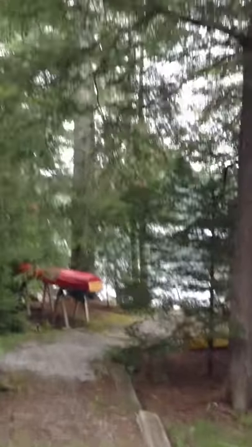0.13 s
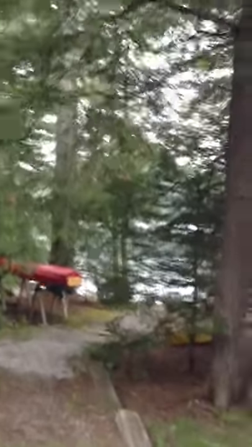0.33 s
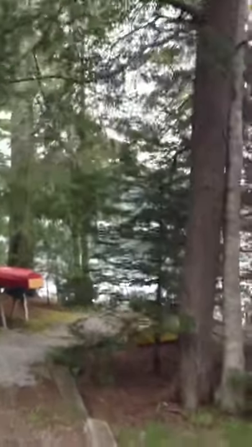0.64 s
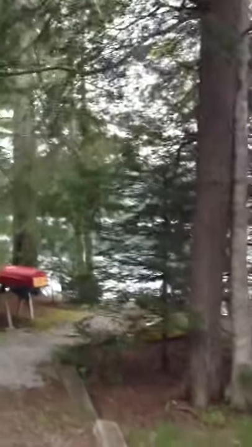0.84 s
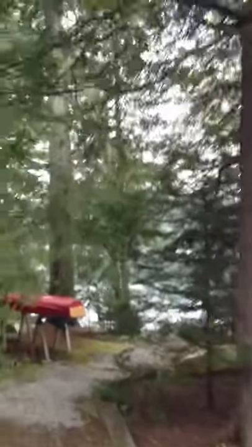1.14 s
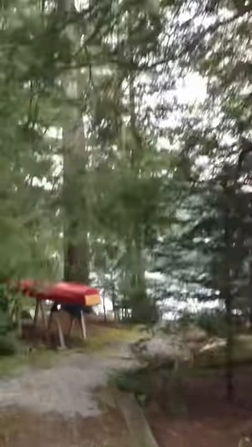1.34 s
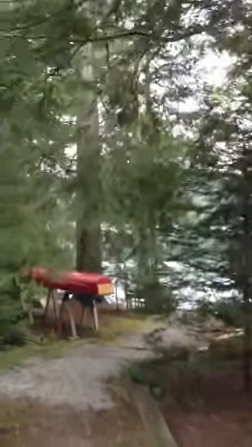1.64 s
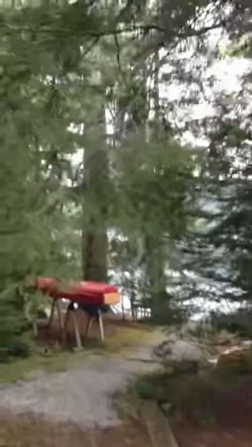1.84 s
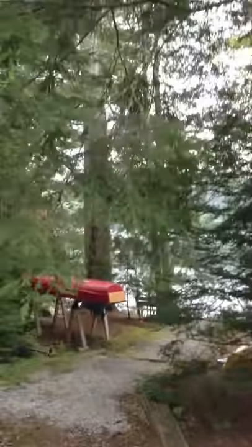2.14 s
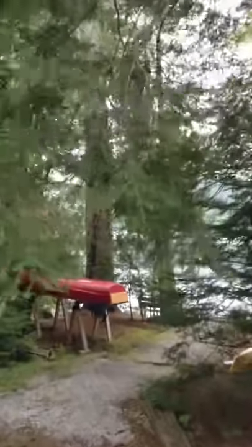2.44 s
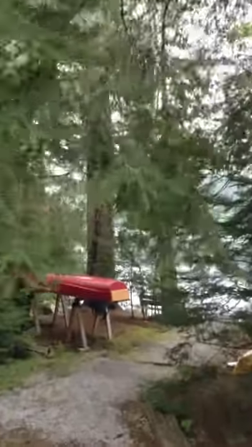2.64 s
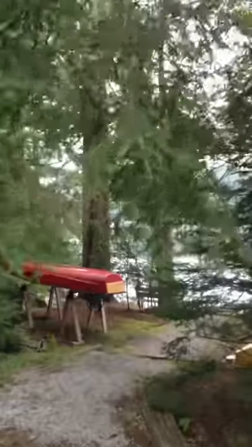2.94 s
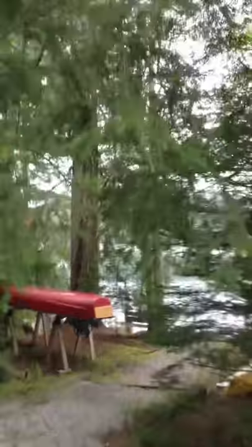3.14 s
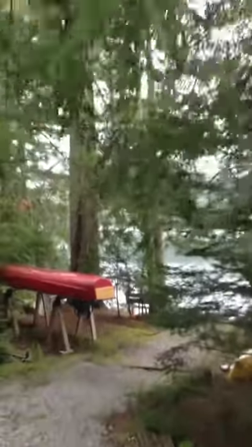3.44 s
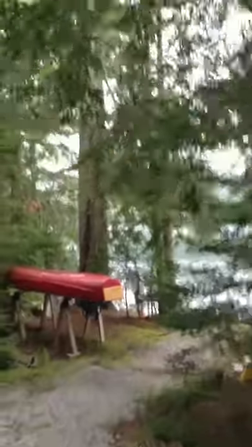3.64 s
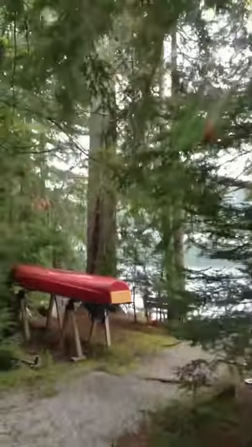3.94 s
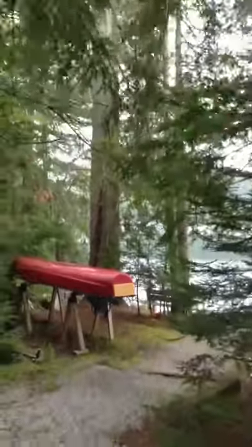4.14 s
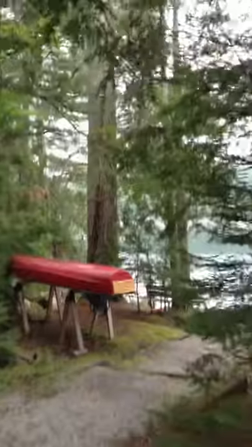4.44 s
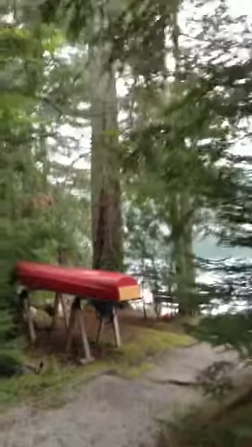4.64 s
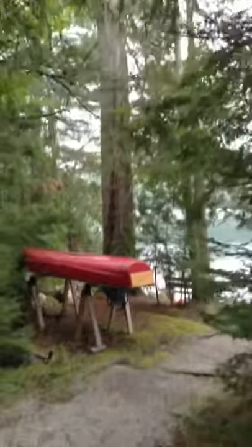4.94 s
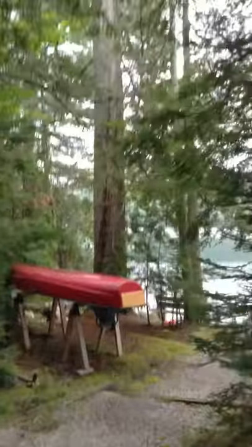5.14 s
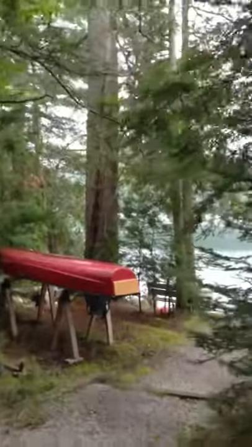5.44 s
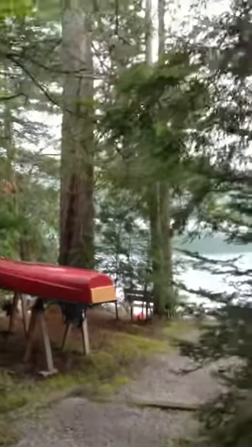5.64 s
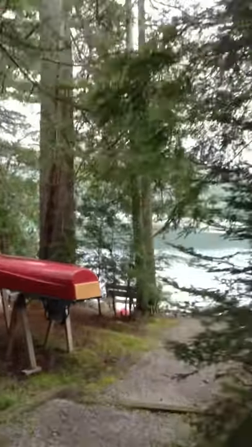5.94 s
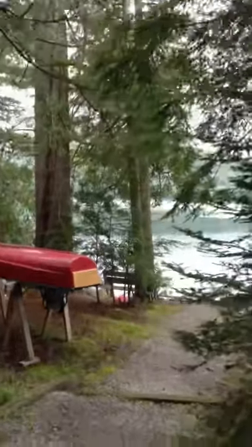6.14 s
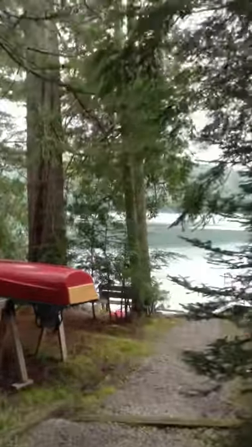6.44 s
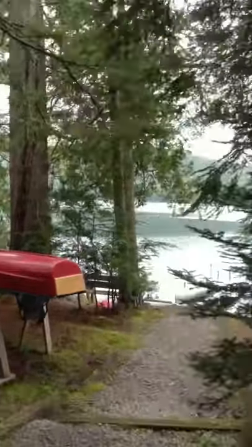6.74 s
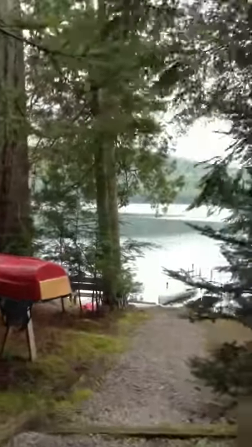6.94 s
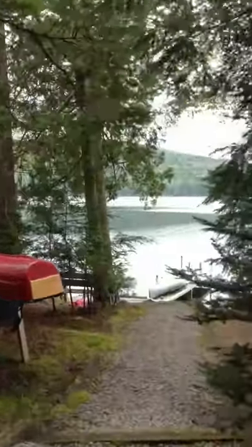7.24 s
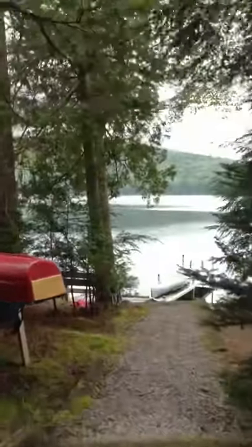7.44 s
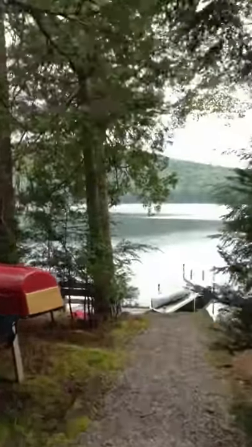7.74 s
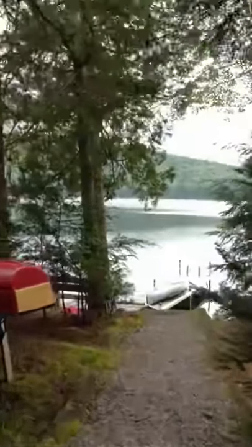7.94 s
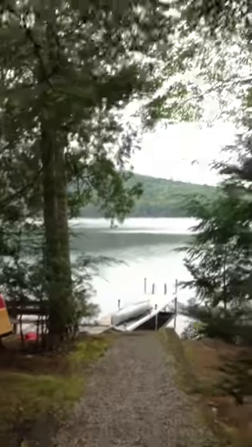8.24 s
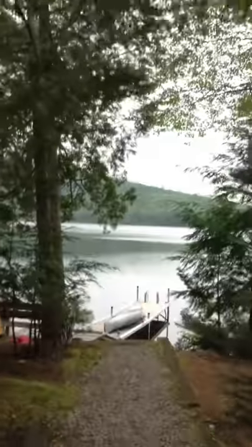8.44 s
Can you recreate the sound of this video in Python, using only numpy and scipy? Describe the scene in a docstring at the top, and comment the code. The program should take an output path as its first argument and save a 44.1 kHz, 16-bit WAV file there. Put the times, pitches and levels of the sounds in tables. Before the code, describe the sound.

Loons call across a quiet wooded lake in clear, nearly pure tones that quaver about eleven times a second, climb in steps and echo off the shore. The fading echo of a call opens the scene. A tremolo comes at about 1 to 1.7 seconds, then several overlap at different pitches from 2 to 3.6 seconds. Another follows from 4 to 4.7 seconds. The loudest runs from about 5 to 6.1 seconds, and after a short pause a last one lasts from 7 to 8 seconds.

Much fainter and close by, footsteps crunch unevenly on gravel. Single stones tick brightly in the first second, near 4.3 and around 8 seconds, and dull knocks bump the handheld microphone now and then. A louder crunch comes at about 8.3 seconds. Soft air and microphone hiss continue throughout.

```python
"""Loons on a wooded pond

Loons trade tremolo calls while someone walks down a gravel path with a phone. Each call, a near-pure
tone with weak harmonics, climbs in steps and quavers about eleven times a second; trees and shore echo it.
Gravel crunches and ticks underfoot and dull knocks reach the phone, over quiet air and microphone hiss."""
import sys
import numpy as np
from scipy import signal
from scipy.fft import rfft, irfft, next_fast_len
from scipy.io import wavfile
from scipy.ndimage import uniform_filter1d, map_coordinates

SR = 44100
rng = np.random.default_rng(int(sys.argv[2]) if len(sys.argv) > 2 else 0)


def int16_out(signal):
    """Quantize to a 16-bit WAV file."""
    q = np.round(np.clip(np.atleast_2d(signal).T, -1, 1) * 32767)
    wavfile.write(sys.argv[1], SR, q.astype(np.int16))


N = 378819


def undb(db):
    return 10 ** (np.asarray(db) / 20)


def level(x, db):
    """Scale to an rms level."""
    return x * undb(db) / np.sqrt(np.mean(x ** 2))


def colour(x, points):
    """Shape a spectrum by (Hz, dB) points."""
    hz, db = np.transpose(points)
    size = next_fast_len(len(x))
    f = np.arange(size // 2 + 1) * SR / size + 1
    gain = undb(np.interp(np.log(f), np.log(hz), db))
    return irfft(rfft(x, size) * gain, size)[:len(x)]


def walk(rate):
    """A slow random waver: levels held 1 / rate s and smoothed twice; spread about 1.5."""
    k = int(SR / rate)
    held = rng.standard_normal(1000)[np.arange(N) // k]
    return 2.05 * uniform_filter1d(uniform_filter1d(held, k), k)


def add(out, s, x):
    """Mix x into out from time s."""
    i = int(s * SR)
    out[i:i + len(x)] += x[:len(out) - i]


def tremolo(kind, start, end, first, quaver_ms, trough_hz, crest_hz, last_hz, end_hz, db, change_db,
            *overtones_db, fall_hz_per_s=2000, overlap_s=.003):
    """Periodic frequency modulation: one or two phrases for loon_voice, quavering on a steady beat."""
    # Each kind: entry level offset in dB, exponent of the level change (higher is later), share by which
    # troughs drift to the end pitch, dip in the troughs in dB, step per harmonic above the third in dB.
    phrase_shapes = {"scoop": (-4.5, 1.1, .3, -8, -6.5), "low": (-6.5, 1, 0.32, -8, -5.5),
                     "middle": (-7, 4.9, .15, -10, -6.5), "wide": (-0.17, 3.7, 0.89, -11, -11),
                     "high": (0.62, 1, 0.14, -15, -8)}
    entry_db, late, drift, *voicing_db = phrase_shapes[kind]
    timbre = (*overtones_db, *voicing_db)
    beat = quaver_ms / 1000
    s = np.arange(first, end - .35 * beat, beat)  # a short remainder joins the last quaver
    k = np.arange(len(s))
    troughs = trough_hz + drift * (end_hz - trough_hz) * k / len(s)
    crests = np.where(k == k[-1], last_hz, crest_hz)
    levels = db + change_db * (k / max(k[-1], 1)) ** late
    rows = list(zip(s, troughs, crests, levels)) + [(end, end_hz, *timbre)]
    ahead = np.array([1, .5]) * (first - start)  # time to the first trough from entry start and middle
    if ahead[0] < .01:
        return [[(start, *rows[0][1:])] + rows[1:]]
    if kind in ("scoop", "low"):  # the voice slides down and cracks where slide and quavers overlap
        slide = (start, *(trough_hz + fall_hz_per_s * ahead), db + entry_db)
        return [[slide, (first + overlap_s, trough_hz, *timbre)], rows]
    above = (crest_hz - trough_hz) * np.sin(np.pi * ahead / beat)
    return [[(start, *(trough_hz + above), db + entry_db)] + rows]


def hoot(start, end, start_hz, middle_hz, end_hz, db, octave_db, third_db=-36, dip_db=-8, step_db=-6.5):
    """A single frequency glide: a phrase of one arch that opens or closes a call."""
    return [(start, start_hz, middle_hz, db), (end, end_hz, octave_db, third_db, dip_db, step_db)]


def loon_voice(rows, slur_s=.012, edge_s=.0061, rasp_depth=.22, patchy_db=3.5):
    """Source and filter: pitch arches once a quaver, sweeping harmonics through the throat's resonances."""
    # Each row: frequency in Hz, gain of the throat in dB.
    throat_response = [(1200, -14.5), (1700, 0.5), (2600, -3), (3700, -4), (4600, -2.5), (5220, -7.5),
                       (6000, -5)]
    ring_hz, ring_width_hz, ring_db, ring_late_s = 5037, 260, 27, .0043
    s, hz = np.array([r[:2] for r in rows]).T  # a row starts each quaver; the last row ends the phrase
    middle_hz, db = np.array([r[2:] for r in rows[:-1]]).T
    octave_db, third_db, dip_db, step_db = rows[-1][2:]
    t = np.arange(s[0], s[-1], 1 / SR)
    age = t - s[0]
    quaver = np.clip(np.searchsorted(s, t, "right") - 1, 0, len(db) - 1)
    arch = np.sin(np.pi * (t - s[quaver]) / np.diff(s)[quaver])
    lift = (middle_hz - (hz[1:] + hz[:-1]) / 2)[quaver] * arch
    pitch = uniform_filter1d(np.interp(t, s, hz) + lift, int(slur_s * SR), mode="nearest")
    phase = 2 * np.pi * np.cumsum(pitch) / SR
    voice = np.sin(phase)
    flutter = np.interp(age / .003, np.arange(200), rng.standard_normal(200))
    rasp = (1 + rasp_depth * flutter) / np.hypot(1, rasp_depth)
    swell_db = 18 * (np.interp(t + .008, t, arch) - .5)  # upper harmonics peak on the rise
    for n, base_db in enumerate([octave_db, *(third_db + step_db * np.arange(5))], start=2):
        # each overtone flickers on its way over the water
        gain_db = base_db + patchy_db * np.interp(age / .03, np.arange(20), rng.standard_normal(20))
        gain_db += (n > 2) * swell_db + np.interp(n * pitch, *np.transpose(throat_response))
        if n == 4:  # this harmonic rings out on leaving a trough
            trough = 1 - np.interp(t - ring_late_s, t, arch)
            gain_db += ring_db * np.exp(-((n * pitch - ring_hz) / ring_width_hz) ** 2) * trough
        voice += rasp * undb(gain_db) * np.sin(n * phase)
    envelope_db = np.interp(t, (s[1:] + s[:-1]) / 2, db) + dip_db * (1 - arch)
    edges = np.clip(np.minimum(age, s[-1] - t) / edge_s, 0, 1)
    return np.sqrt(2) * undb(envelope_db) * edges * voice


def shore_echo(calls, build_s=.027):
    """Reverberation: scattered reflections merge into noise tails that decay exponentially."""
    # Near trees, then far shore. Each row: gain in dB, seconds to fall 60 dB, treble cutoff in Hz.
    reflectors = [(-11, 0.3, 4000), (-22, 1.48, 3300)]
    t = np.arange(2 * SR) / SR
    response = 0
    for db, t60, dull_hz in reflectors:
        tail = rng.standard_normal(len(t)) * undb(-60 * t / t60) * (1 - np.exp(-t / build_s))
        tail = signal.lfilter(*signal.butter(1, [900, dull_hz], "band", fs=SR), tail)
        response = response + undb(db) * tail / np.sqrt(np.sum(tail ** 2))
    return signal.fftconvolve(calls, response)


def loons(lead_s=.4, mid_pond_db=-24.5, evening=.29, wander=.0001, flicker=1.2):
    """Propagation in moving air: the direct calls flicker and the echo paths stretch and shrink."""
    # Each row: kind; start, end and first trough in seconds; quaver in ms; trough, crest, last crest and
    # end pitch in Hz; level and its change in dB; harmonics 2 and 3 in relative dB before the throat.
    tremolo_calls = [ ("high", -0.26, -0.08, -0.26, 89.3, 1225, 1385, 1340, 1090, -40.5, 7.7, -40, -38),
                     ("middle", 1.085, 1.35, 1.085, 88, 930, 1175, 1191, 1130, -34, 1.2, -25.5, -46),
                     ("high", 1.36, 1.6, 1.436, 94, 1175, 1396, 1335, 1213, -33, -2, -39, -42.5),
                     ("low", 1.985, 2.28, 2.016, 103, 590, 755, 780, 790, -47, 1.5, -4.5, -38),
                     ("low", 2.29, 2.465, 2.35, 74, 640, 800, 757, 883, -39, -1, -6.5, -31),
                     ("high", 2.315, 2.52, 2.315, 95, 770, 1104, 1047, 994, -40.5, -.6, -39, -37),
                     ("wide", 2.46, 2.8, 2.52, 88, 965, 1223, 1115, 866, -34, -1.71, -28, -33),
                     ("low", 2.6, 2.79, 2.6, 86.7, 810, 917, 936, 740, -42, 0.48, -3.5, -32.5),
                     ("wide", 2.805, 3.06, 2.885, 112, 930, 1330, 1192, 1100, -35, -3, -32, -34.5),
                     ("middle", 3.04, 3.24, 3.07, 81, 955, 1183, 1185, 970, -29.5, 1.5, -28.5, -43),
                     ("high", 3.25, 3.59, 3.325, 84, 1170, 1396, 1327, 1070, -34, -4, -37, -37.5),
                     ("low", 4.03, 4.29, 4.095, 93, 655, 853, 913, 784, -40.5, 1.7, -9.5, -33),
                     ("wide", 4.295, 4.7, 4.295, 96, 965, 1280, 1105, 850, -30.5, -5.5, -32.5, -36.5),
                     ("scoop", 4.92, 5.005, 4.949, 90, 656, 723, 723, 890, -42, 0, 3.7, -20),
                     ("middle", 5.015, 5.3, 5.045, 83, 975, 1190, 1216, 980, -24.5, -3.5, -29, -40.5),
                     ("high", 5.3, 5.555, 5.297, 92, 1165, 1399, 1317, 1230, -31, -5, -40, -35),
                     ("low", 5.54, 5.7, 5.587, 80, 660, 814, 779, 860, -34, -1.1, -1.98, -25),
                     ("wide", 5.695, 6.03, 5.758, 88.5, 915, 1238, 1163, 875, -27, -8, -26, -32),
                     ("scoop", 6.91, 7.0, 6.945, 90, 635, 745, 745, 896, -40, 0, 0.87, -29.5),
                     ("middle", 7.0, 7.295, 7.035, 84, 985, 1188, 1202, 960, -27.5, -3.1, -26.5, -39),
                     ("high", 7.295, 7.55, 7.292, 90, 1150, 1380, 1295, 1230, -30, -4, -44, -40),
                     ("low", 7.395, 7.56, 7.437, 86.3, 645, 819, 787, 840, -38.5, 1.43, -3, -41),
                     ("wide", 7.555, 7.885, 7.613, 90.5, 932, 1225, 1142, 870, -31, -2.12, -37, -40.5), ]
    # Each row: start and end in seconds; start, middle and end pitch in Hz; level in dB; harmonic 2 in
    # relative dB before the throat.
    single_hoots = [(-0.07, -0.006, 969, 928, 910, -48, -19), (1.002, 1.086, 621, 743, 770, -48, 5.7),
                    (1.623, 1.711, 642, 676, 580, -50, -12), (2.524, 2.638, 572, 688, 553, -47.5, -7),
                    (2.794, 2.838, 641, 615, 600, -51.5, -17), (2.986, 3.044, 629, 740, 842, -46.5, 4.5),
                    (3.099, 3.199, 693, 780, 610, -42.5, -11.5), (3.593, 3.66, 958, 937, 916, -49, -22),
                    (4.695, 4.723, 716, 710, 680, -55.5, -17), (6.041, 6.137, 678, 680, 595, -48, 2.5),
                    (7.565, 7.609, 697, 614, 580, -47.5, -10), (7.887, 7.967, 624, 619, 596, -48.5, -12)]
    phrases = [rows for call in tremolo_calls for rows in tremolo(*call)]
    phrases += [hoot(*call) for call in single_hoots]
    lead = int(lead_s * SR)  # calls just before time zero leave their echo
    direct, scattered = np.zeros((2, N + lead))
    for rows in phrases:
        voice = loon_voice(rows)
        start = rows[0][0] + lead_s
        add(direct, start, voice)
        nearness = np.abs(voice).max() / undb(mid_pond_db)
        add(scattered, start, voice * nearness ** -evening)  # echoes depend less on a bird's distance
    echo = map_coordinates(shore_echo(scattered), [lead + np.arange(N) + wander * SR * walk(25)])
    return direct[lead:] * undb(flicker * walk(45)) + echo


def air(db=-64, waver=3):
    """Broadband noise of quiet air and microphone: the bass wavers, the treble stays smooth."""
    # Each row: frequency in Hz, relative spectral density in dB.
    air_spectrum = [(18, -70), (30, -21.5), (242, -3.5), (781, -11), (1190, -0.5), (1660, -16.5),
                    (3110, -8), (12400, -12), (15300, -12.5)]
    hiss = level(colour(rng.standard_normal(N), air_spectrum), db)
    bass = signal.lfilter(*signal.butter(2, 600, fs=SR), hiss)
    return hiss + bass * (undb(waver * walk(12)) - 1)


def grains(per_s, decay_s, scatter_db=2):
    """A Poisson process: decaying noise bursts of uneven size at random moments, at unit rms."""
    starts = (rng.random(N) < per_s / SR) * undb(scatter_db * rng.exponential(size=N))
    envelope = signal.lfilter([1], [1, -np.exp(-1 / (decay_s * SR))], starts)
    return level(envelope * rng.standard_normal(N), 0)


def gravel(shuffle_db=-68.5, split_hz=900):
    """Granular friction: stones grind low and grit crackles high, a faint shuffle swelling at each step."""
    # Each row: start in seconds, length in seconds, weight of the stones in dB, weight of the grit in dB.
    footsteps = [(0.004, 0.24, -62, -63), (0.435, 0.082, -64, -60.5), (1.07, 0.21, -62.5, -62.5),
                 (2.547, 0.37, -62, -64), (4.74, .35, -63, -72), (6.271, 0.15, -67.5, -66),
                 (7.52, 0.61, -61.5, -63), (8.245, 0.17, -50, -48), (8.397, 0.2, -58, -63)]
    # Each row: frequency in Hz, relative gain in dB.
    crunch_spectrum = [(47, -60), (80, -29), (168, -6.5), (355, -3.5), (2380, -13.5), (15000, -32)]
    stones = grains(per_s=400, decay_s=.006) * undb(1.5 * walk(14))
    stones = signal.lfilter(*signal.butter(2, split_hz, fs=SR), stones)
    grit = grains(per_s=1500, decay_s=.002) * undb(1.2 * walk(30))
    grit = signal.lfilter(*signal.butter(2, split_hz, "high", fs=SR), grit)
    weights = np.full((2, N), undb(shuffle_db))
    for start, length_s, *layers_db in footsteps:
        for weight, db in zip(weights, layers_db):
            add(weight, start, undb(db) * np.sqrt(np.hanning(int(length_s * SR))))
    crunch = colour(stones * weights[0] + grit * weights[1], crunch_spectrum)
    return crunch / np.std(colour(stones + grit, crunch_spectrum))


def blows(events, middle_hz, cycles, crack_db, spread):
    """Impact excitation: a broadband crack, then a damped ring, each at its own pitch."""
    out = np.zeros(N)
    pitches = middle_hz * np.exp(spread * rng.uniform(-1, 1, len(events)))
    for (start, db), hz in zip(events, pitches):
        turns = np.arange(int(8 * cycles * SR / hz)) * hz / SR
        ring = np.sin(2 * np.pi * turns) * turns / cycles * np.exp(1 - turns / cycles)
        ring[:2] += undb(crack_db) * np.array([1, -1])
        add(out, start, undb(db) * ring)
    return out


def knocks():
    """Heavily damped low vibration: dull knocks reach the phone."""
    # Each row: start in seconds, peak of the ring's envelope in dB.
    thuds = [(0.206, -50), (1.264, -57), (2.643, -48), (2.754, -48), (4.016, -46), (4.438, -54),
             (5.197, -52), (5.674, -48), (7.391, -46.5), (7.806, -48), (7.855, -46), (7.982, -54),
             (8.333, -46), (8.476, -48)]
    return blows(thuds, middle_hz=300, cycles=.65, crack_db=-22, spread=.3)


def stone_ticks():
    """Brief impacts have wide spectra: single stones tick brightly."""
    # Each row: start in seconds, peak of the ring's envelope in dB.
    strikes = [(0.4708, -41), (0.6978, -40), (0.9152, -42), (1.1094, -44.5), (4.2554, -41), (7.6008, -39),
               (7.852, -42), (7.9853, -45), (8.0512, -42)]
    return blows(strikes, middle_hz=2630, cycles=.77, crack_db=3, spread=.12)


def scene():
    """Superposition: all sources sum in one channel."""
    impacts = stone_ticks() + knocks()
    return (loons() + gravel() + air() + impacts)[None]


def record(dry, bass_hz=95, top_hz=15400):
    """Band limiting: the phone drops the deep bass and cuts the top."""
    thinned = signal.sosfilt(signal.butter(2, bass_hz, "high", fs=SR, output="sos"), dry)
    return signal.sosfilt(signal.ellip(10, .2, 60, top_hz, fs=SR, output="sos"), thinned)


dry = scene()
out = record(dry)
int16_out(out)
```